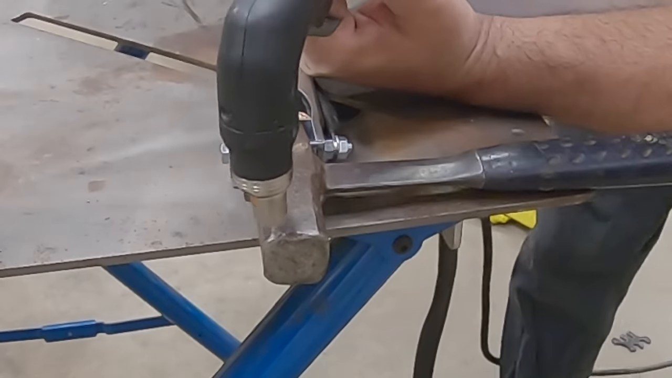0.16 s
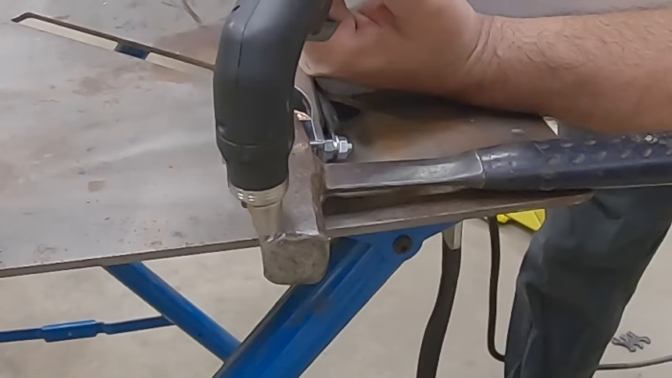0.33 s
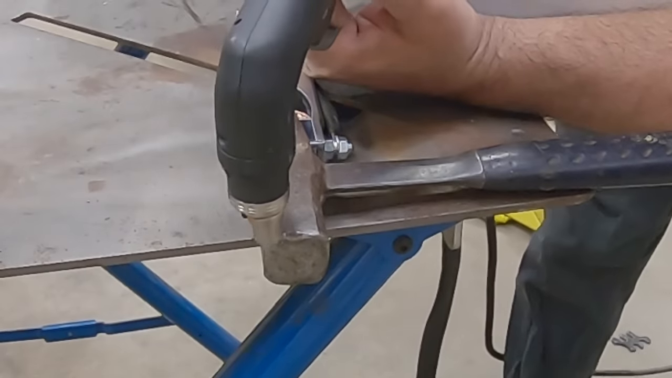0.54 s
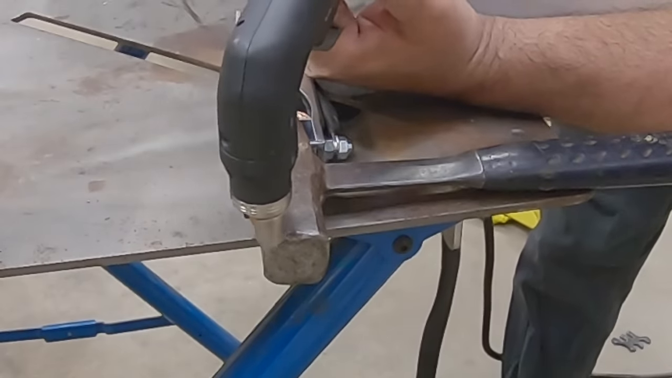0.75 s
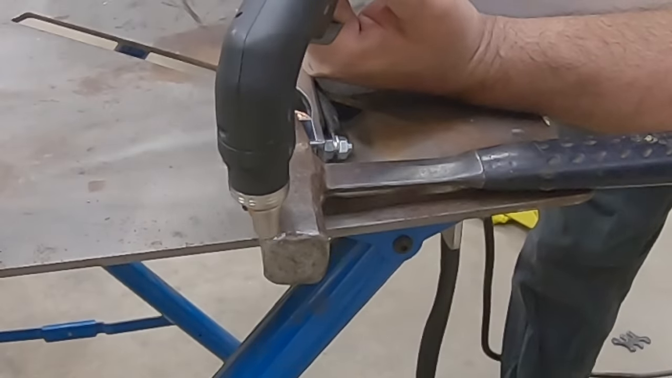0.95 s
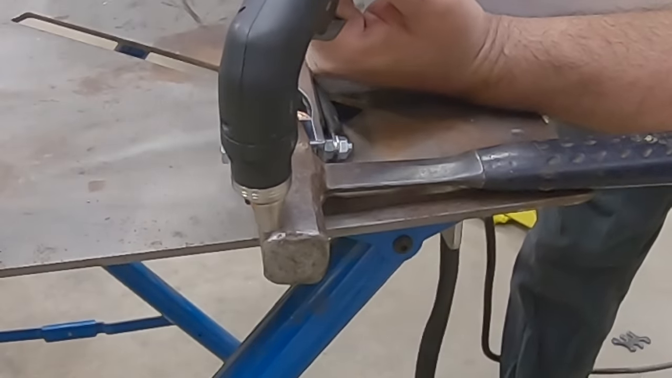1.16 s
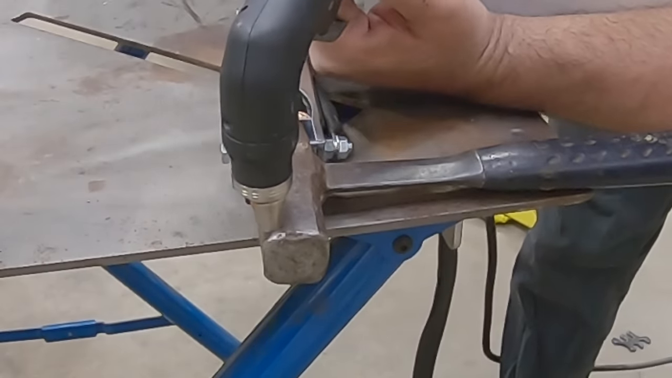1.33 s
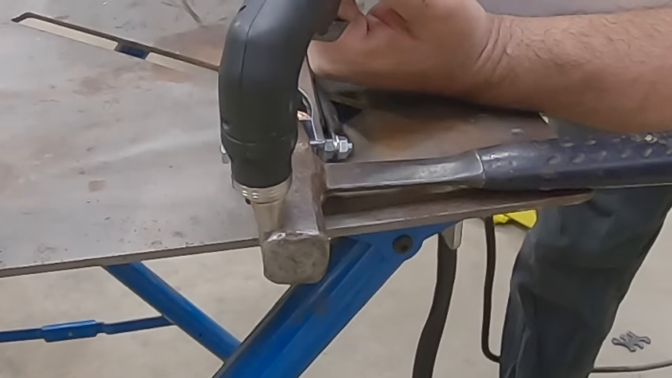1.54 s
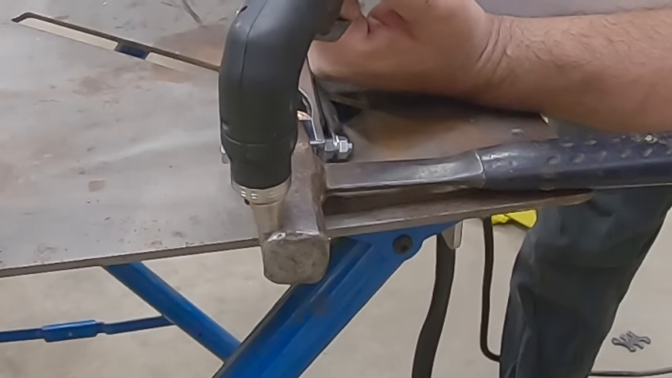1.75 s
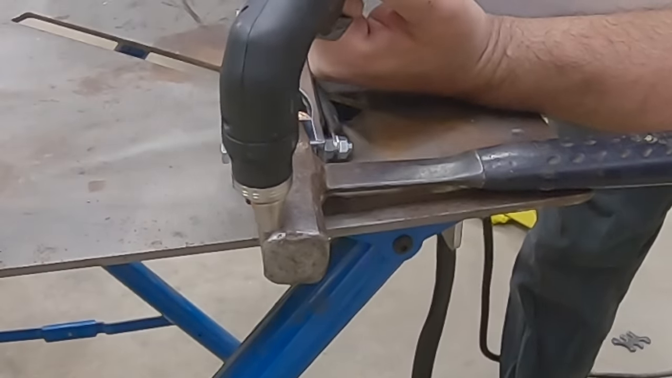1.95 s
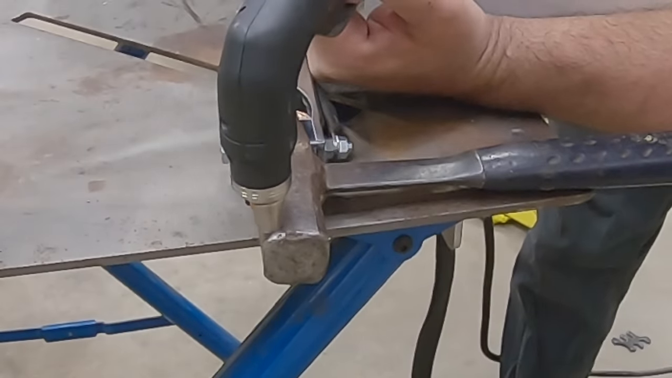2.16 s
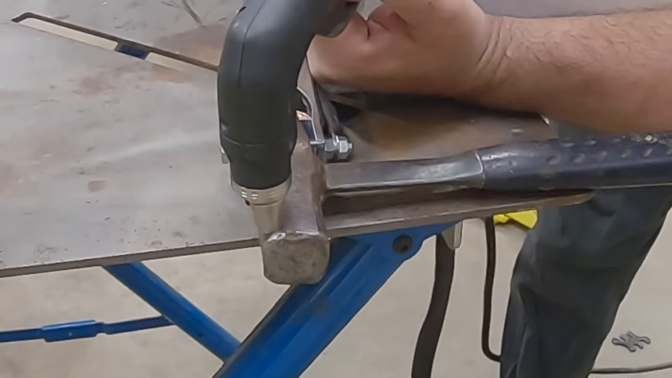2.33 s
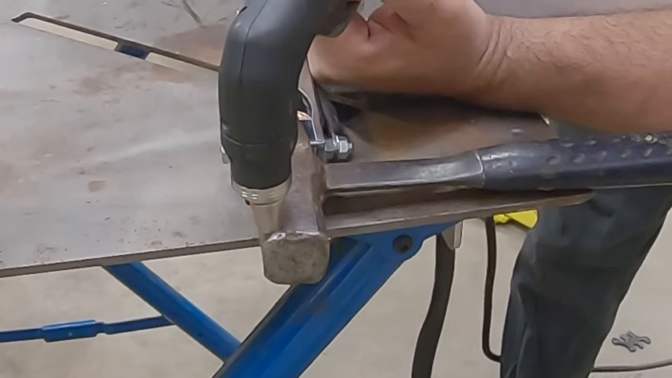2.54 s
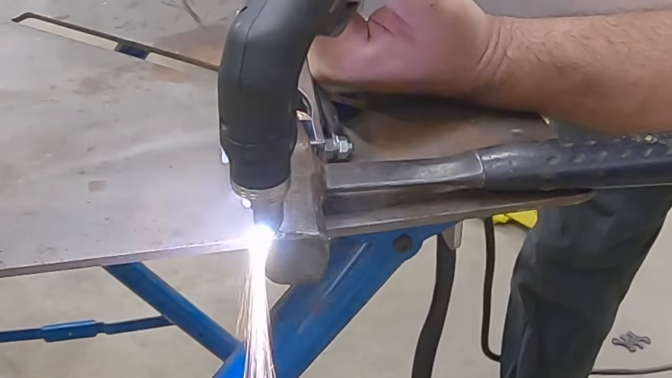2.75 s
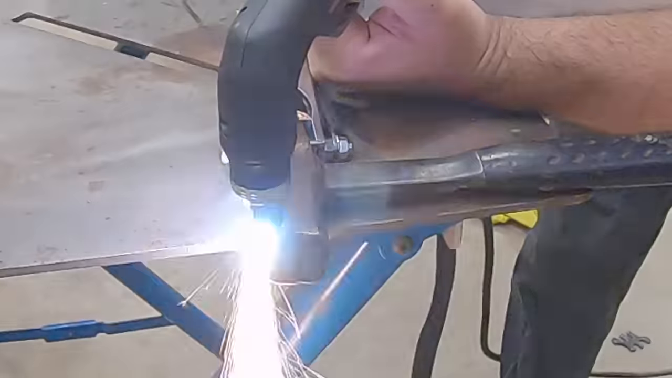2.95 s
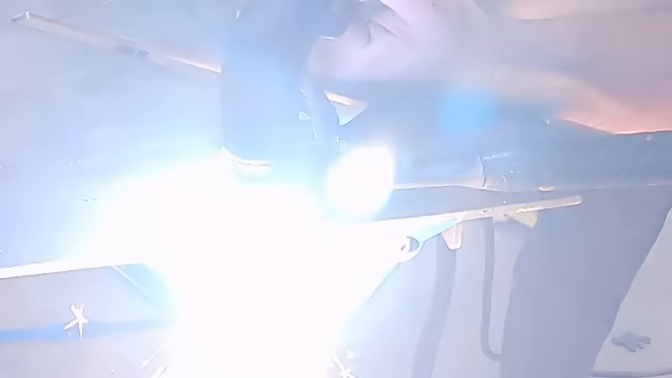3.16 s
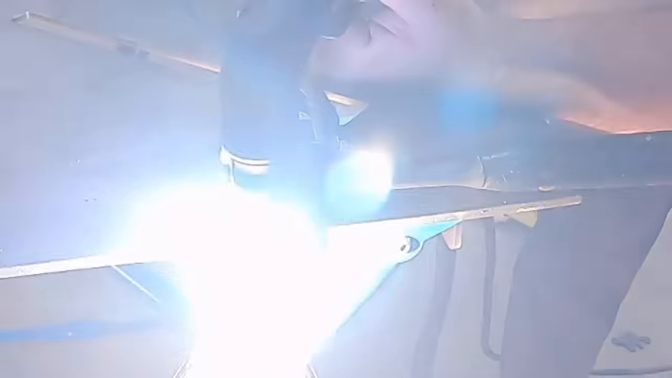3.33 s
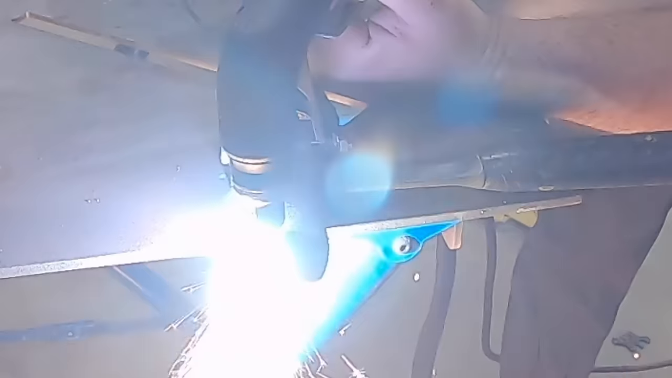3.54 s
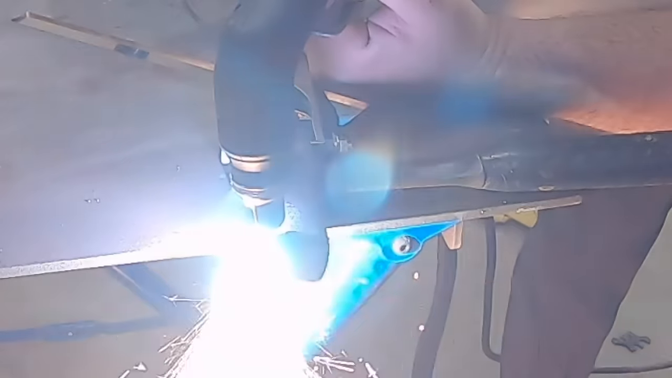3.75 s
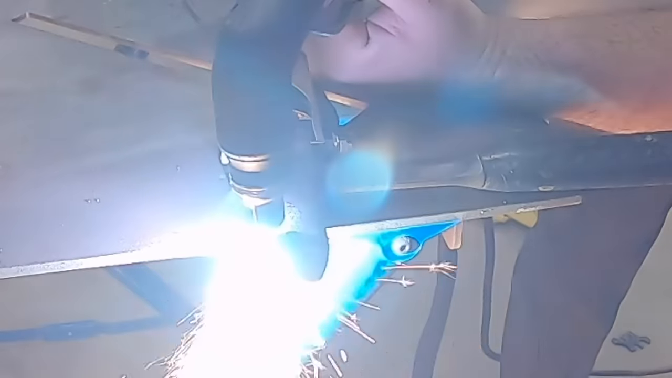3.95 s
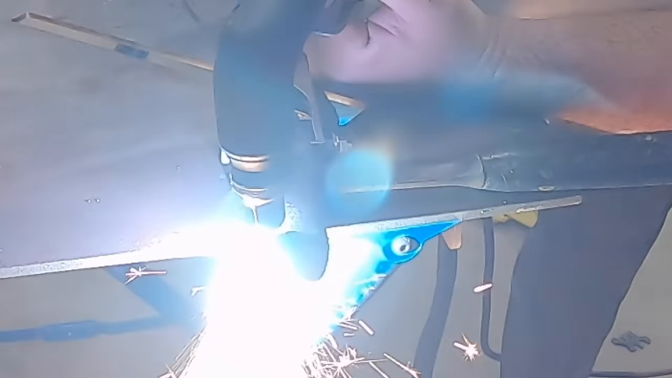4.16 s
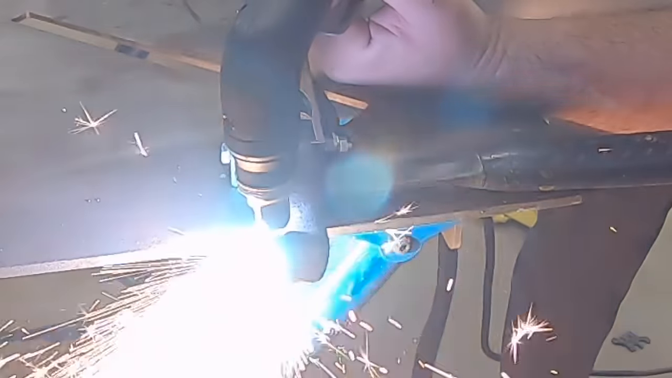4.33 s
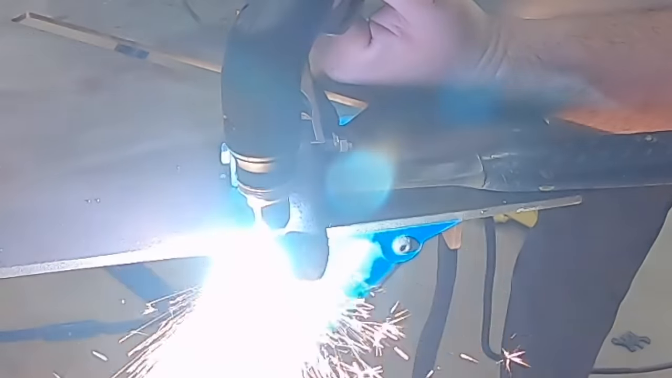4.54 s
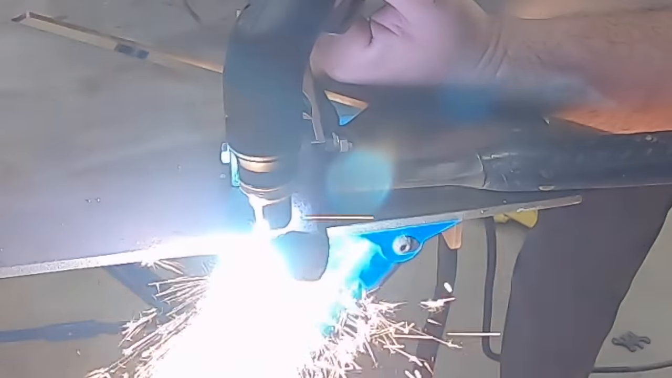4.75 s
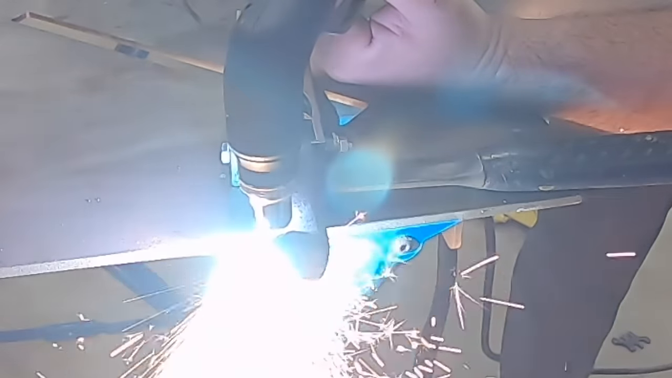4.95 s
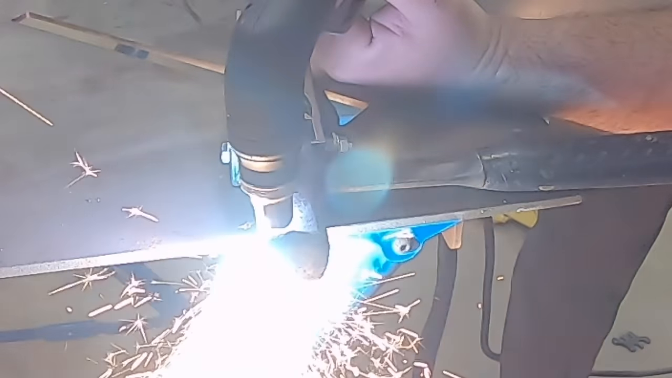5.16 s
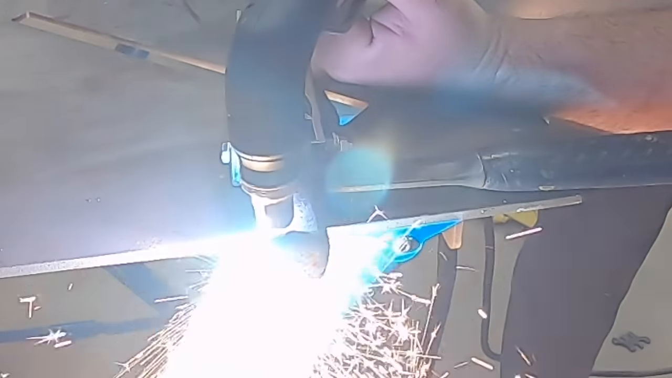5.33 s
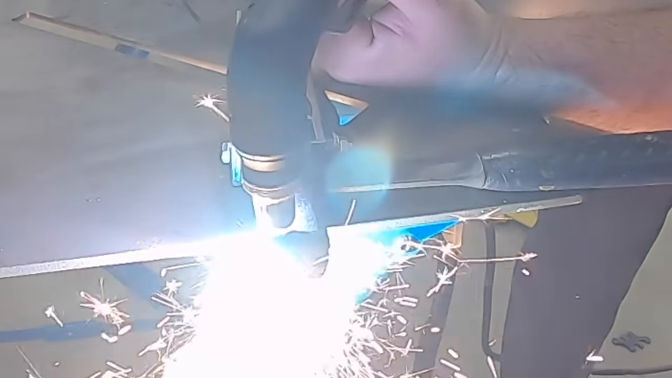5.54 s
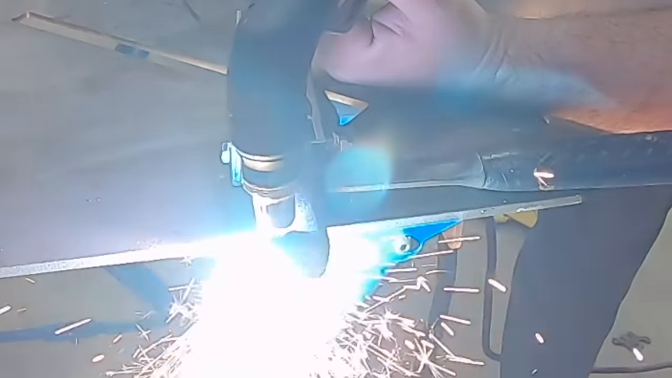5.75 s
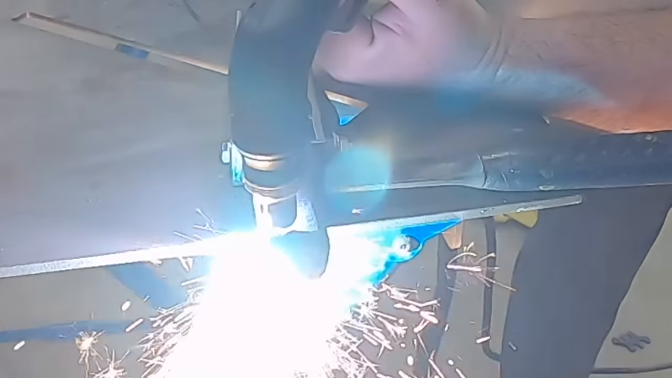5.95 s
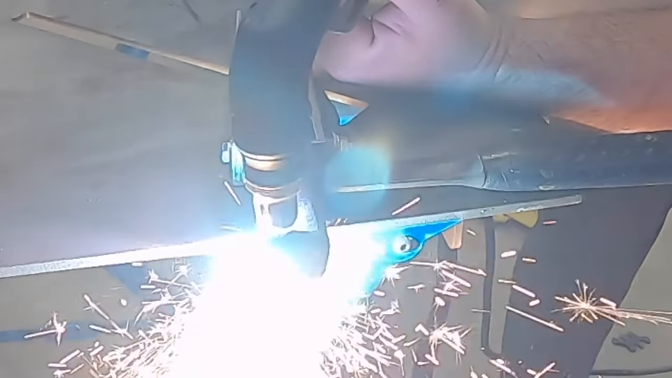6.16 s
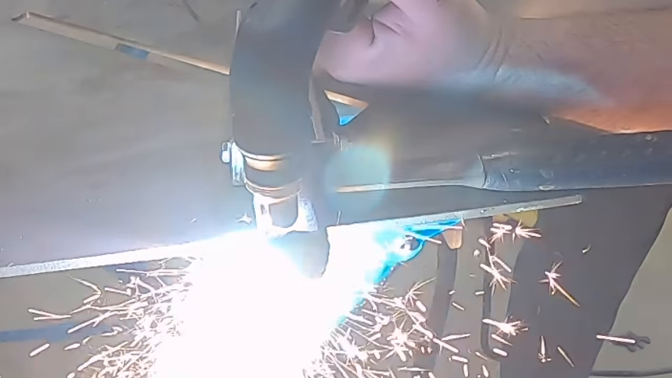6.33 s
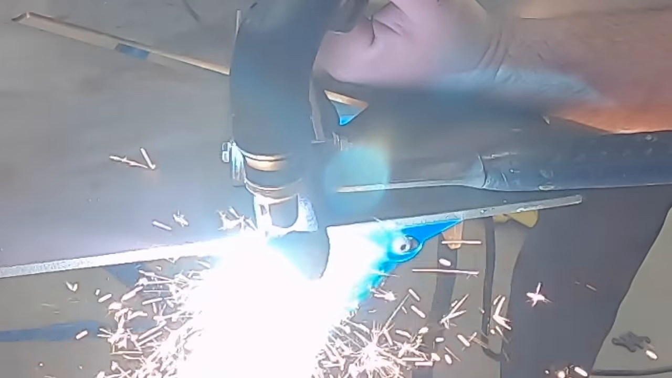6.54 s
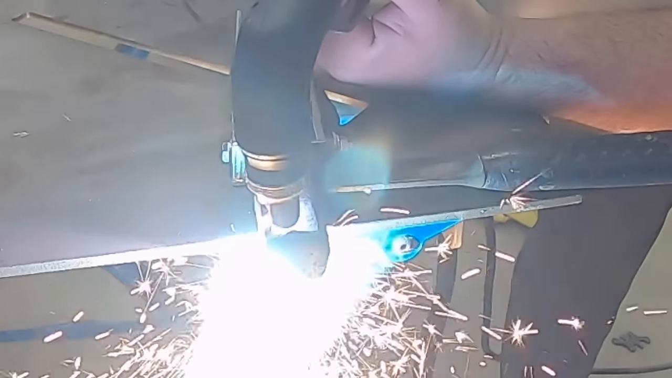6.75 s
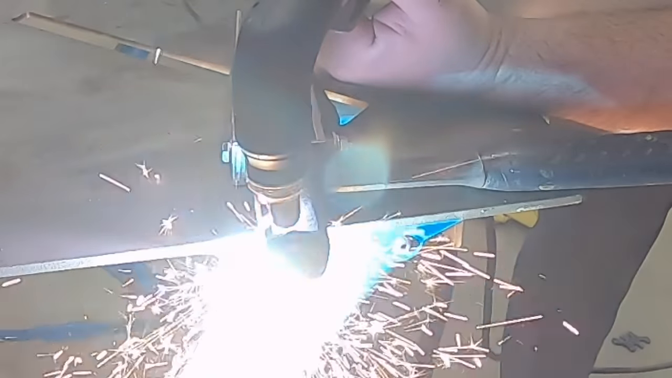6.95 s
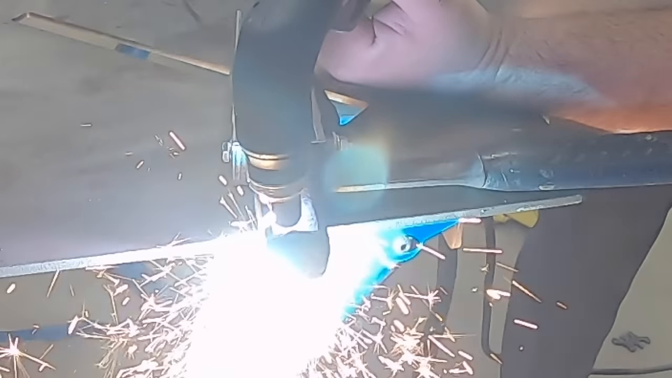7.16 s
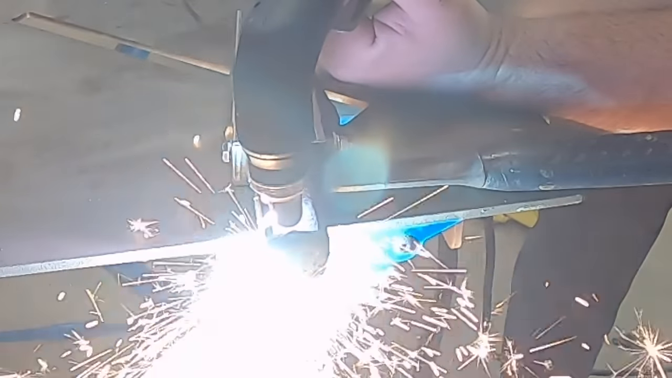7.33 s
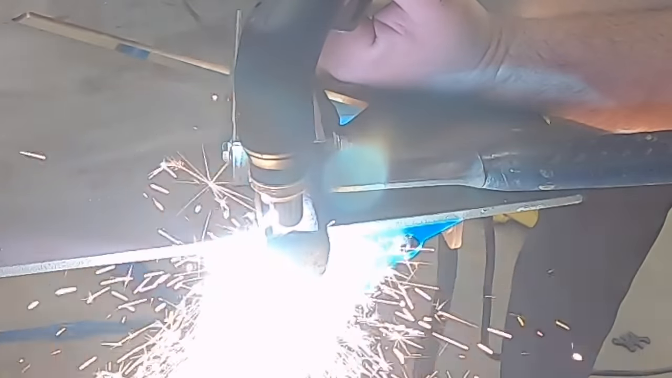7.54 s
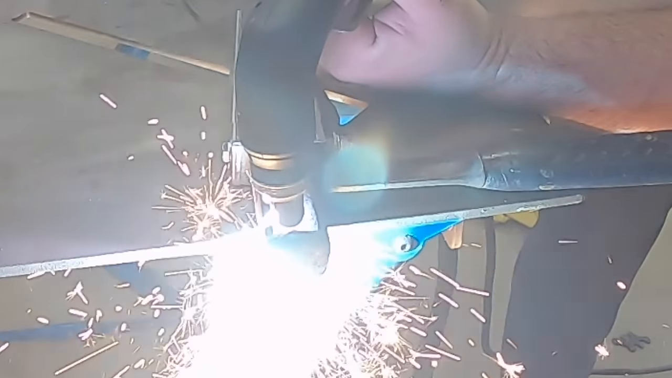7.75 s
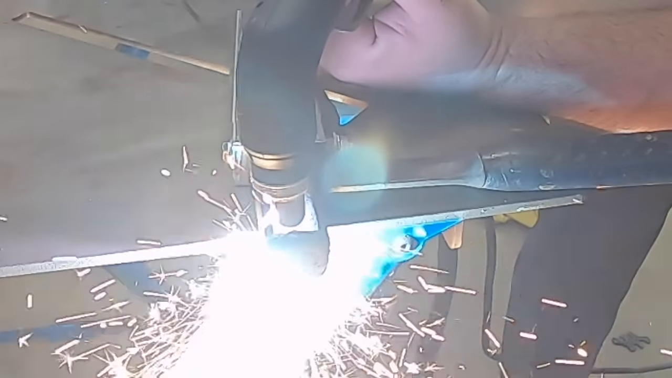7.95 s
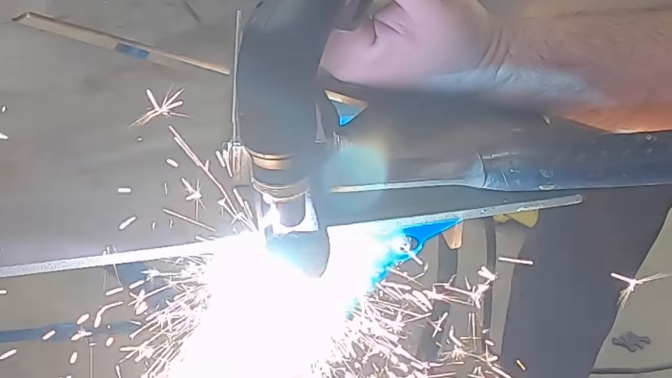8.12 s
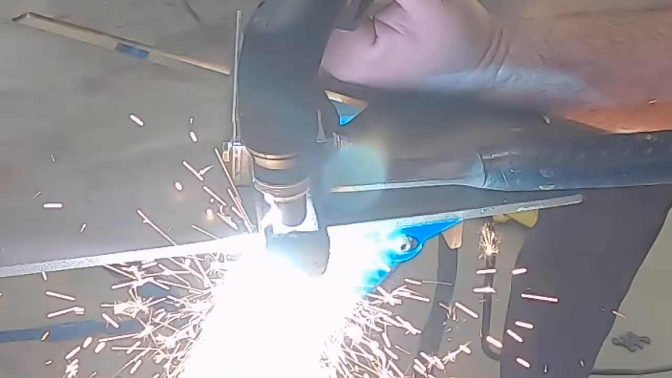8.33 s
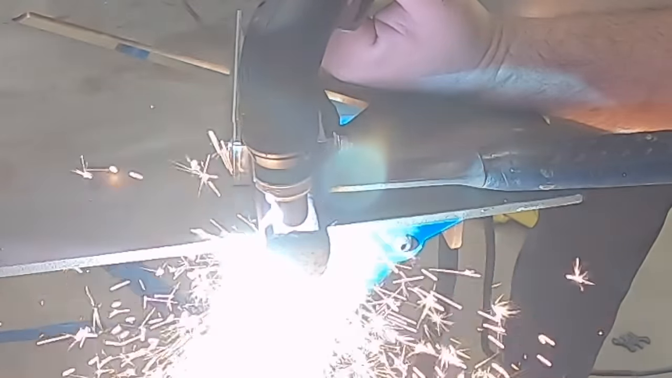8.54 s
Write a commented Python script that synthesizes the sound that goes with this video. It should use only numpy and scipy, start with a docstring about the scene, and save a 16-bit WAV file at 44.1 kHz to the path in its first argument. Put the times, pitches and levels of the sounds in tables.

```python
"""A workshop, where a plasma torch cuts over a steel edge: fans hum, a faint electrical whine sings,
the torch ticks on its guide and the trigger clicks; then the air valve opens, the jet blasts,
the arc jumps to the steel with a pop and the cut hisses on, sinking slowly.
Jet and air are coloured noise, fans and whine are wavering sines, touches are noise bursts through
resonances and pops are short pressure swings; a short hall surrounds the torch."""
import sys
import numpy as np
from scipy import signal
from scipy.fft import rfft, irfft
from scipy.io import wavfile

SR = 44100
rng = np.random.default_rng(int(sys.argv[2]) if len(sys.argv) > 2 else 0)


def to_wav(sig):
    """Store sig (one row per channel, or 1-D mono) as 16-bit WAV at the path in sys.argv[1].

    Samples outside -1..1 are clipped; the rate is SR.
    """
    pcm = np.clip(np.atleast_2d(sig), -1, 1) * 32767
    pcm = np.round(pcm).astype(np.int16)
    wavfile.write(sys.argv[1], SR, pcm.T)  # frames by channels


N = 383229
TIME = np.arange(N) / SR  # s
HZ = np.arange(1, N // 2 + 2) * SR / N

# Colour of the jet noise: (frequency [Hz], relative density [dB per Hz])
JET_COLOUR = [(20, -31), (130, -28), (200, -22), (340, -20.5), (440, -12.5), (1000, -11.5), (1600, -11.5),
              (3200, -12), (4300, -10), (6400, -12.9), (8300, -8.8), (10300, 0), (12000, -.7),
              (15700, -3.8)]
# Borders between the regions of the jet: (frequency [Hz])
REGION_EDGES_HZ = [140, 800, 3000, 8500, 12000]
# Regions of the jet: deep murmur, rumble, kerf roar, edge rush, nozzle hiss, top air:
# (level before the arc [dB], level once cutting [dB], time to reach it [s], slope [dB per s],
#  change mid-cut [dB], share of the dips [ratio])
JET_REGIONS = [(-79, -75.5, .03, -0.8, -0.3, .1), (-61.5, -55.5, .03, -.5, 3.5, 0.25),
               (-50.5, -44, 0.17, -.5, 0.5, 0.42), (-43, -39, 0.26, -0.48, -0.94, 0.64),
               (-35.5, -34, 0.41, -0.29, 0.85, 1.1), (-32, -30.5, .2, -0.11, -2.2, 0.68)]
# Brief dips of the hiss: (time [s], depth [dB], fall [s], recovery [s])
HISS_DIPS = [(2.89, -1.5, 0.046, 0.045), (3.08, -6, 0.046, 0.058), (4.33, -2.5, 0.041, .2)]
# Peaks and dips from plate, guide and bench around the jet:
# (frequency [Hz], width [Hz], level early in the cut [dB], level late in the cut [dB])
PLATE_AND_BENCH = [(590, 80, -1.7, -2.8), (1530, 220, 4.4, 2.5), (1990, 110, 4.4, 2.8),
                   (2240, 120, -2.2, -3.5), (2580, 400, 3.4, 1.9), (2770, 100, -3.0, -3.5),
                   (3260, 370, -2.5, -2.5), (4230, 620, 3.3, 1.8), (5190, 190, 3.2, 3.4),
                   (5390, 180, -3.0, -0.4), (5570, 70, 2.9, 1.4), (5710, 70, -1.9, -2.2),
                   (6000, 240, 2.1, 4.9), (6520, 130, 3.6, 1.3), (7060, 340, 2.5, 3.5),
                   (7430, 70, -0.7, -2.6), (7640, 500, 3.8, 0.5), (8490, 370, 2.2, -0.8),
                   (9250, 500, 2.4, 2.1), (10010, 320, -0.4, 3.4), (10420, 500, 3.0, -0.3),
                   (10770, 210, -3.8, -4.0), (11030, 310, 0.9, 5.0), (11440, 350, 0.1, -1.6),
                   (11810, 230, -4.2, -4.2), (12180, 500, -1.6, 1.3), (13120, 200, 2.6, -0.3),
                   (13520, 180, -0.4, 3.0), (14610, 190, -0.3, 4.2), (14900, 140, 2.1, -1.9)]
# Flow as the valve opens in steps: (time [s], level [dB])
VALVE_FLOW = [(2.745, -75), (2.748, -43), (2.76, -56), (2.7645, -26), (2.775, -34), (2.778, 3), (2.78, 0),
              (2.782, -7), (2.787, 2)]
# Torch moving along the cut: (time [s], share of the way [0 to 1])
TORCH_TRAVEL = [(4.0, 0), (7.7, 1)]
# Low pops, the valve and the arc jumping to the steel: (time [s], peak [dB], length of the drop [s])
PRESSURE_POPS = [(2.7642, -50, .0004), (3.0334, -30.5, .0004)]
# Trigger clicking and settling: (time [s], burst level before ringing [dB], decay time [s])
TRIGGER_CLICKS = [(2.0735, -50, 0.0022), (2.0752, -46.5, 0.0025), (2.0815, -59, .003), (2.0964, -66, .002)]
# Resonances of the torch body: (frequency [Hz], width [Hz], level [dB])
TORCH_MODES = [(2380, 120, 6), (3300, 900, -2), (4840, 500, -5), (6300, 1500, -5), (8460, 150, 6),
               (9570, 200, 6), (11200, 2500, 3), (14000, 2500, -6)]
# Torch ticking on its guide: (time [s], burst level before ringing [dB], decay time [s])
GUIDE_TICKS = [(.588, -72, .002), (.79, -70, .004), (.798, -70, .003), (.804, -66, .003), (.822, -67, .002),
               (.8365, -61, .002), (.853, -61, .003), (.863, -62, .003), (1.105, -69, .002),
               (1.134, -68, .002), (1.161, -68, .002), (1.27, -74, .01), (1.295, -74, .01)]
# Resonances of the guide: (frequency [Hz], width [Hz], level [dB])
GUIDE_MODES = [(3700, 600, 11), (9200, 700, 3), (12800, 3000, -6)]
# Blade tone of the first fan: (time [s], level [dB])
FAN_LEVEL_CURVE = [(0.0, -63), (0.2, -61.5), (0.55, -68), (0.8, -75), (1.25, -74), (1.4, -66), (1.6, -69),
                   (1.8, -66), (2.35, -63), (2.6, -70)]
# Higher overtones of the first fan: (multiple of the blade tone, level against the octave [dB])
FAN_HARMONICS = [(3, -2.5), (4, -11.5), (5, -16)]
# Tones of the second fan: (frequency [Hz], relative level [dB])
SECOND_FAN_TONES = [(1096, 0), (1644, -3), (2192, -15), (1473.3, -6), (885, -6)]
# Electrical whine: (time [s], level [dB])
WHINE_CURVE = [(0.05, -83), (0.2, -75), (0.35, -89), (0.65, -87), (0.95, -79), (1.3, -76.5), (2.4, -80)]
# Colour of the workshop air: (frequency [Hz], relative density [dB per Hz])
AIR_COLOUR = [(12, -9), (28, -8.5), (150, -8), (330, -4.5), (520, -5.5), (680, -9.5), (800, -8),
              (1100, -10), (1800, -15.5), (3000, -21.5), (5400, -29.5), (7000, -37.5), (10000, -39.5),
              (15700, -39)]

ARC_S = 3.01  # the arc jumps to the steel
MID_CUT_S, SWELL_S = 5.94, 1.26  # middle and half-width of the change while the torch crosses the plate
FLUTTER_DB, FLUTTER_HZ = .5, 9.5  # spread and rate of each region's flutter
HALL_T60_S, HALL_DB = .1, -12
FAN_HZ, WHINE_HZ = 516, 14100
# The even overtones drop out about once a second; the odd ones sag in between
OCTAVE_DB, EVEN_GAP_DB, ODD_GAP_DB = -72.5, -14, -6
GAP_S, GAP_EVERY_S, GAP_SHARPNESS = 0.19, 0.95, 1.9
AIR_DB, SECOND_FAN_DB = -64, -75
DYING_HISS_DB, DYING_HISS_T60_S = -70.5, 0.6
# The background sinks just before the jet, ever faster
SINK_FROM_S, SINK_TO_S, SINK_BEND = 2.31, 2.76, 1.75
AIR_SINK_DB, TONES_SINK_DB = -12, -15
OVERLOAD = .19  # ceiling toward which peaks are rounded
CUTOFF_HZ = 15730


def from_db(db):
    """Decibels to gain."""
    return 10 ** (np.asarray(db) / 20)


def rms_one(x):
    """Scale to unit rms."""
    return x / np.sqrt(np.mean(x ** 2) + 1e-20)


def in_time(rows):
    """Draw a two-column curve sample by sample."""
    s, value = np.transpose(rows)
    return np.interp(TIME, s, value)


def coloured(colour):
    """Spectrum of random noise with the given colour."""
    hz, level_db = np.transpose(colour)
    return rfft(rng.standard_normal(N)) * from_db(np.interp(np.log(HZ), np.log(hz), level_db))


def drift(rate_hz):
    """Smooth chance movement with spread 1: noise through two equal one-pole lowpasses."""
    r = np.exp(-2 * np.pi * rate_hz / SR)
    smooth = signal.lfilter([1], [1, -2 * r, r * r], rng.standard_normal(N + SR))
    return rms_one(smooth[SR:])  # the first second lets the filter settle


def resonate(x, hz, width_hz):
    """One resonance, with gain near 1 on top."""
    r = np.exp(-np.pi * width_hz / SR)
    zeros = np.array([1, 0, -1]) * (1 - r * r) / 2
    poles = [1, -2 * r * np.cos(2 * np.pi * hz / SR), r * r]
    return signal.lfilter(zeros, poles, x)


def tone(hz, waver_db):
    """A sine, of unit rms before its level wavers."""
    sine = np.sqrt(2) * np.sin(2 * np.pi * (hz * TIME + rng.random()))
    return sine * from_db(waver_db * drift(1.9))


def jet():
    """Turbulent noise coloured by its surroundings; each region swells and flutters on its own."""
    surroundings = np.array(PLATE_AND_BENCH)
    shapes = np.array([1 / (1 + (2 * (HZ - hz) / width) ** 2) for hz, width, *_ in surroundings])
    early, late = coloured(JET_COLOUR) * from_db(surroundings[:, 2:].T @ shapes)
    lowpasses = [1 / (1 + (HZ / edge) ** 24) for edge in REGION_EDGES_HZ]
    below = [0] + lowpasses + [1]
    way = in_time(TORCH_TRAVEL)
    blast = np.zeros(N)
    for low, high, level_db in zip(below, below[1:], region_levels()):
        band = high - low
        early_region = rms_one(irfft(early * band, N))
        late_region = rms_one(irfft(late * band, N))
        region = (1 - way) * early_region + way * late_region
        blast += region * from_db(level_db + FLUTTER_DB * drift(FLUTTER_HZ))
    valve_open = TIME > VALVE_FLOW[0][0]
    return blast * from_db(in_time(VALVE_FLOW)) * valve_open


def region_levels():
    """Level of each region in dB: a step as the arc bites, a slope, a broad change mid-cut, dips."""
    swell = np.exp(-((TIME - MID_CUT_S) / SWELL_S) ** 2)
    dips = np.zeros(N)
    for s, depth_db, fall, recovery in HISS_DIPS:
        dips += depth_db * np.exp(-((TIME - s) / np.where(TIME < s, fall, recovery)) ** 2)
    since_arc = TIME - ARC_S
    levels = []
    for before_db, cut_db, bite_s, slope, mid_db, share in JET_REGIONS:
        bite = np.clip(since_arc / bite_s, 0, 1)
        change_db = cut_db - before_db + slope * since_arc + mid_db * swell
        levels.append(before_db + bite * change_db + share * dips)
    return levels


def pops():
    """Each pop is a sharp pressure drop, then a swing back three times as long and a third as high."""
    out = np.zeros(N)
    for s, db, length in PRESSURE_POPS:
        phase = np.interp(TIME, [s, s + length, s + 4 * length], [0, np.pi, 2 * np.pi])
        out -= from_db(db) * np.sin(phase) * np.where(phase < np.pi, 1, 1 / 3)
    return out


def touches(events, modes):
    """Short dying bursts of noise that ring the modes of a body."""
    envelope = np.full(N, 1e-18)
    for s, db, decay in events:
        envelope += from_db(db) * (TIME > s) * np.exp(-np.abs(TIME - s) / decay)
    burst = envelope * rng.standard_normal(N)
    ringing = np.zeros(N)
    for k, (hz, width, db) in enumerate(modes):
        ringing += from_db(db) * resonate(burst, hz, width) * (-1) ** k  # neighbours in opposite sign
    return ringing


def hall(x):
    """Direct sound plus a dense dying cloud of reflections, which changes as the torch travels."""
    t, way = TIME[:SR // 4], in_time(TORCH_TRAVEL)
    clouds = rng.standard_normal((2, len(t))) * from_db(-60 * t / HALL_T60_S) * (t > .003)
    clouds *= from_db(HALL_DB) / np.sqrt(np.sum(clouds ** 2, axis=1, keepdims=True))
    early = signal.fftconvolve(x * np.sqrt(1 - way), clouds[0])[:N]
    late = signal.fftconvolve(x * np.sqrt(way), clouds[1])[:N]
    return x + early + late


def first_fan():
    """A blade tone with overtones; even and odd overtones sag by turns."""
    cycle = np.cos(2 * np.pi * (TIME - GAP_S) / GAP_EVERY_S)
    gaps = ((1 + cycle) / 2) ** GAP_SHARPNESS
    even_db = OCTAVE_DB + EVEN_GAP_DB * gaps
    odd_db = OCTAVE_DB + ODD_GAP_DB * (1 - gaps)
    fan = from_db(in_time(FAN_LEVEL_CURVE)) * tone(FAN_HZ, 0.71)
    fan += from_db(even_db) * tone(2 * FAN_HZ, 1.2)
    for multiple, db in FAN_HARMONICS:
        overtone_db = (odd_db if multiple % 2 else even_db) + db
        fan += from_db(overtone_db) * tone(multiple * FAN_HZ, 1.5)
    return fan


def second_fan():
    """A set of steady pitches, each wavering in level on its own."""
    return sum(from_db(SECOND_FAN_DB + db) * tone(hz, 1.7) for hz, db in SECOND_FAN_TONES)


def whine():
    """A faint electrical whine: one high sine that swells and fades."""
    return from_db(in_time(WHINE_CURVE)) * tone(WHINE_HZ, .4)


def dying_hiss():
    """A bright hiss, broadly resonant noise already fading away at the start."""
    hiss = rms_one(resonate(rng.standard_normal(N), 4600, 9000))
    return from_db(DYING_HISS_DB - 60 * TIME / DYING_HISS_T60_S) * hiss


def shop():
    """Air noise, fans and whine, which sink before the jet, and the dying hiss."""
    sink = np.clip((TIME - SINK_FROM_S) / (SINK_TO_S - SINK_FROM_S), 0, 1) ** SINK_BEND
    air = from_db(AIR_DB + AIR_SINK_DB * sink) * rms_one(irfft(coloured(AIR_COLOUR), N))
    tones = first_fan() + second_fan() + whine()
    return air + from_db(TONES_SINK_DB * sink) * tones + dying_hiss()


def scene():
    """The torch in its hall over the workshop, alike in both channels as at one microphone."""
    ticks = touches(GUIDE_TICKS, GUIDE_MODES)
    clicks = touches(TRIGGER_CLICKS, TORCH_MODES)
    mono = hall(jet() + pops() + ticks + clicks) + shop()
    return np.array([mono, mono])


def record(dry):
    """Peaks are rounded softly, then a steep elliptic lowpass cuts the top."""
    rounded = OVERLOAD * np.tanh(dry / OVERLOAD)
    lowpass = signal.ellip(14, .3, 80, CUTOFF_HZ, fs=SR, output="sos")
    return signal.sosfilt(lowpass, rounded)


dry = scene()
out = record(dry)
to_wav(out)
```